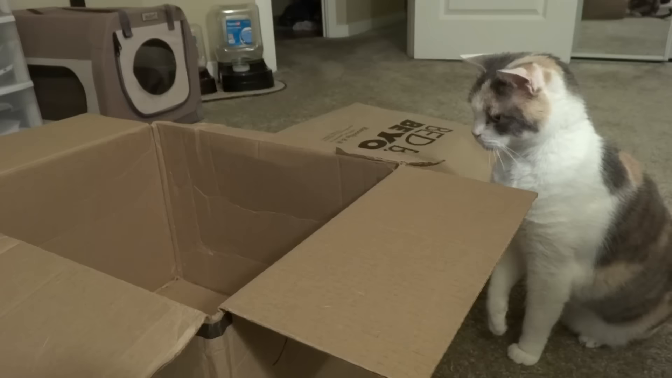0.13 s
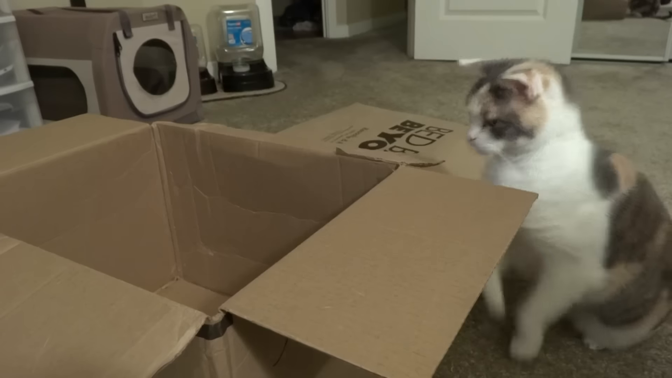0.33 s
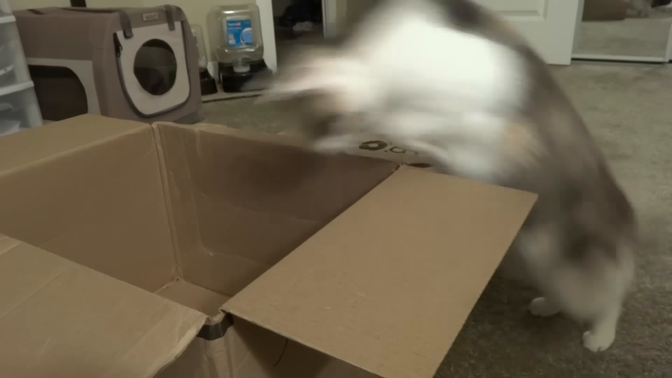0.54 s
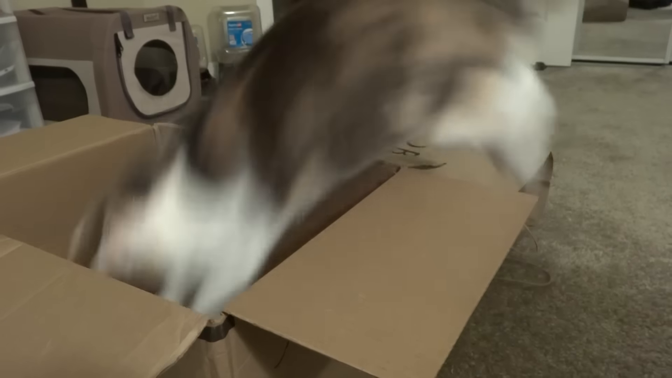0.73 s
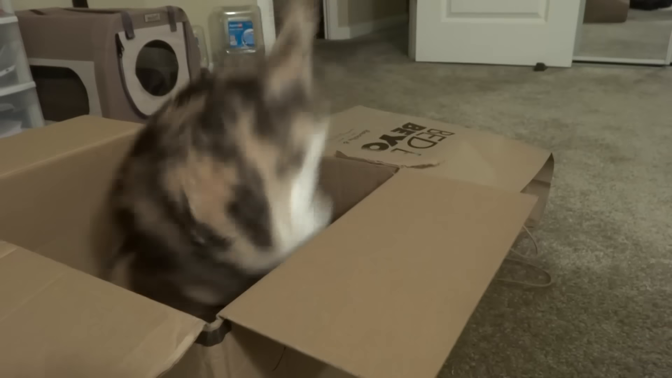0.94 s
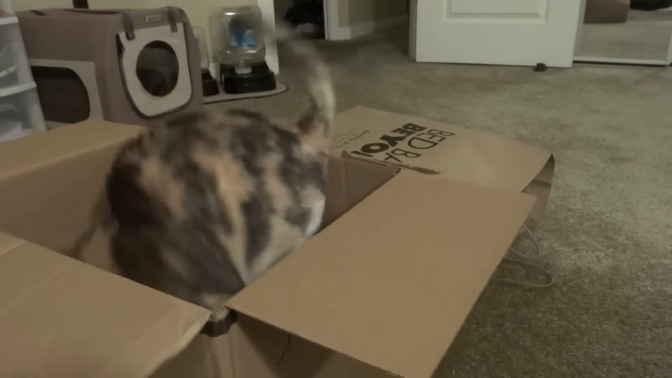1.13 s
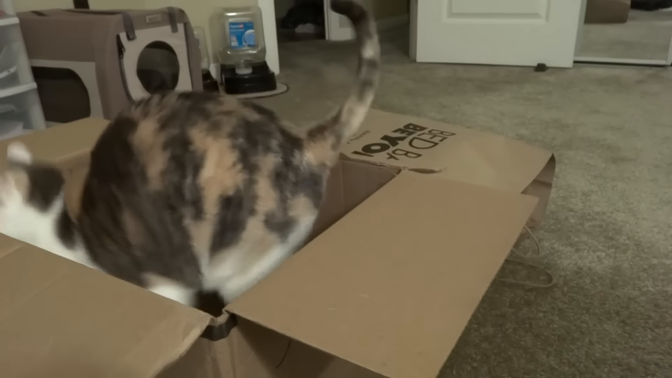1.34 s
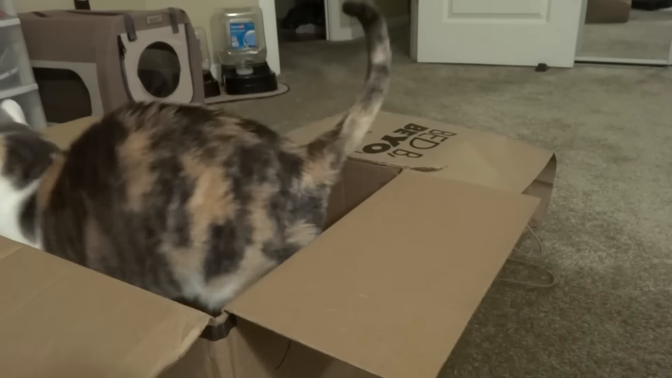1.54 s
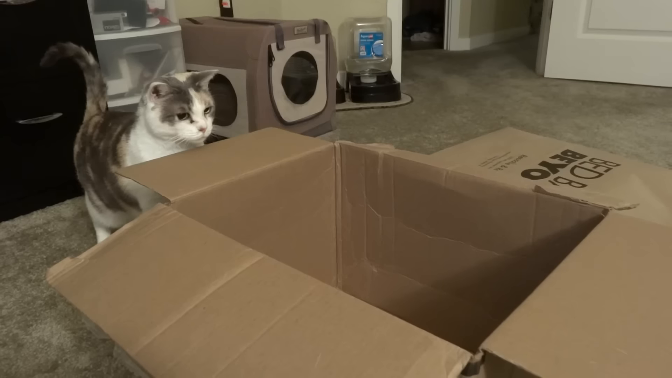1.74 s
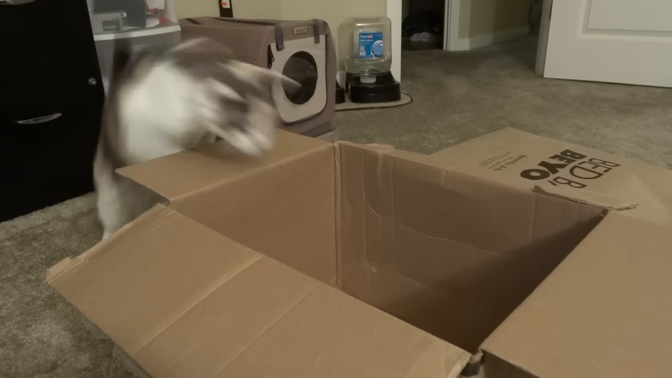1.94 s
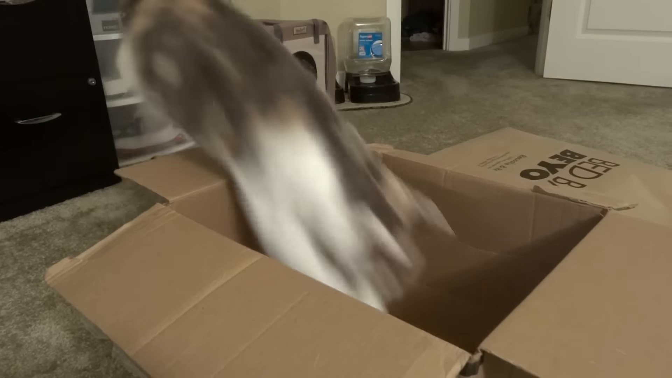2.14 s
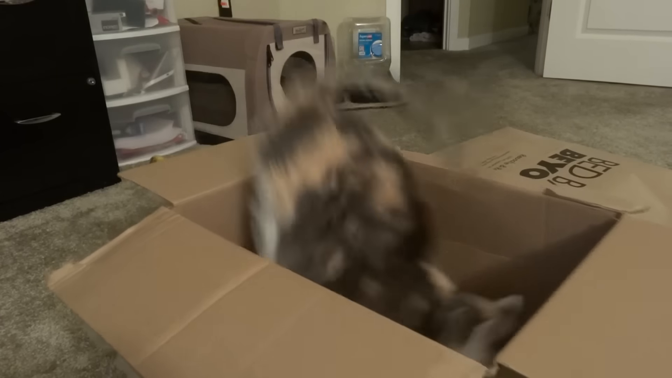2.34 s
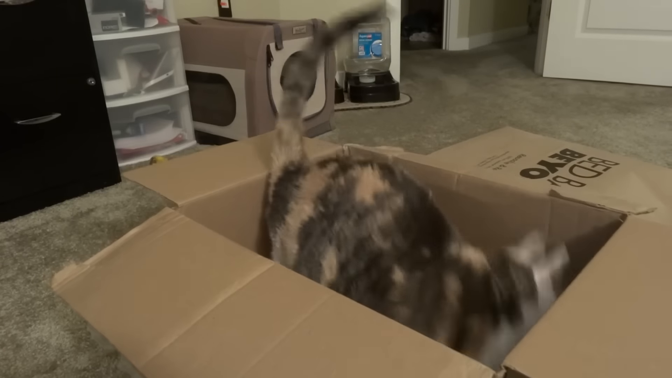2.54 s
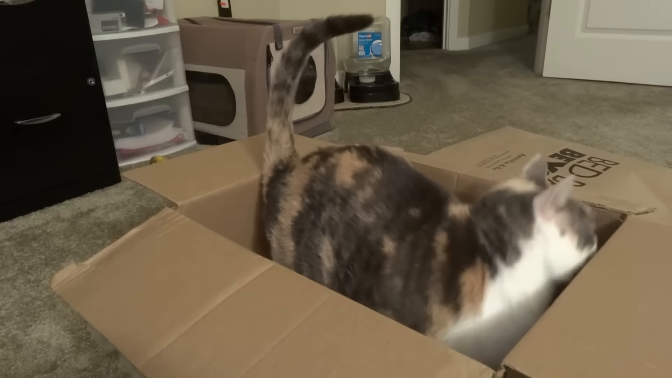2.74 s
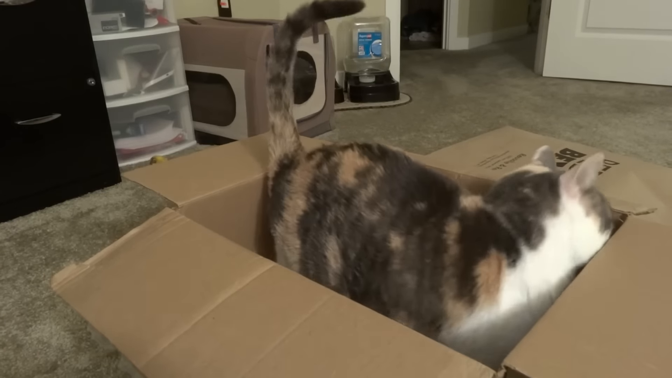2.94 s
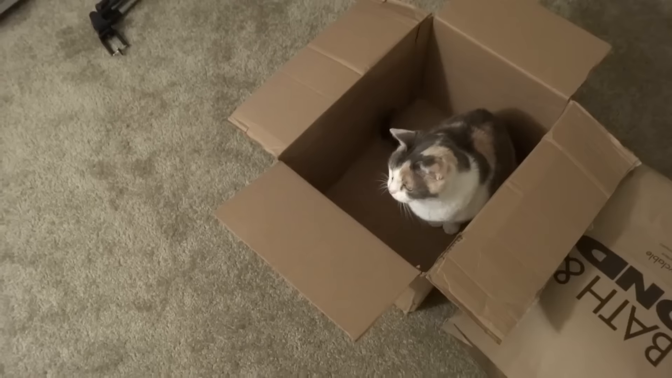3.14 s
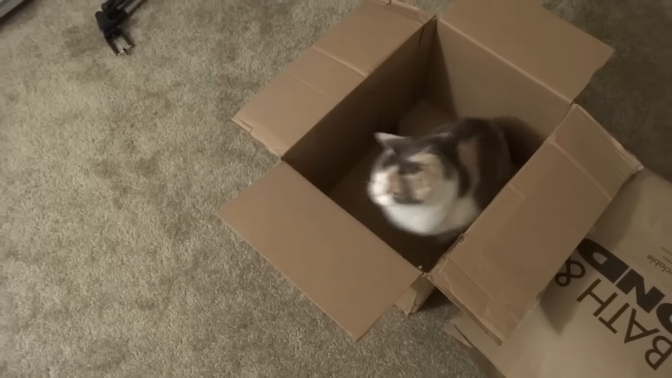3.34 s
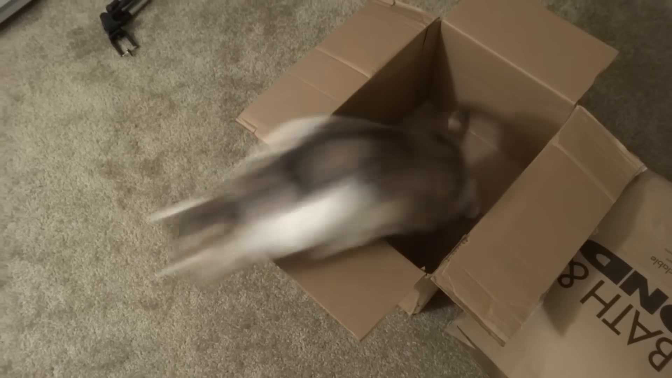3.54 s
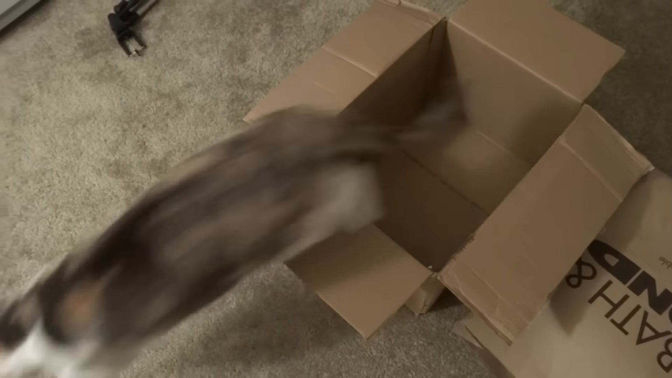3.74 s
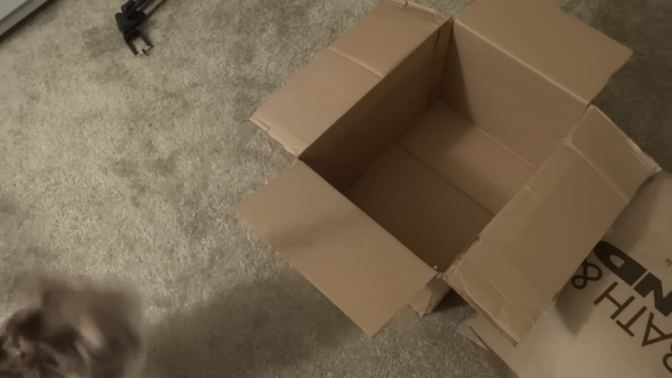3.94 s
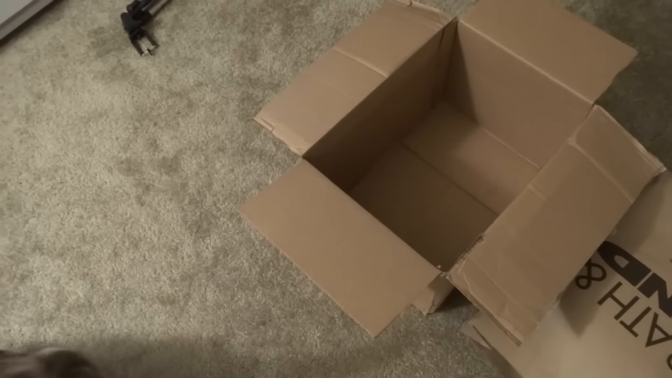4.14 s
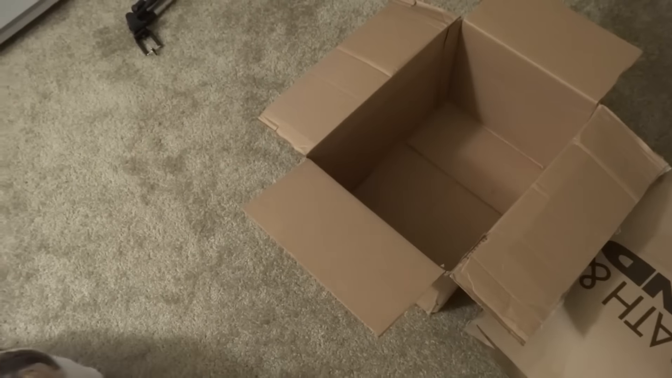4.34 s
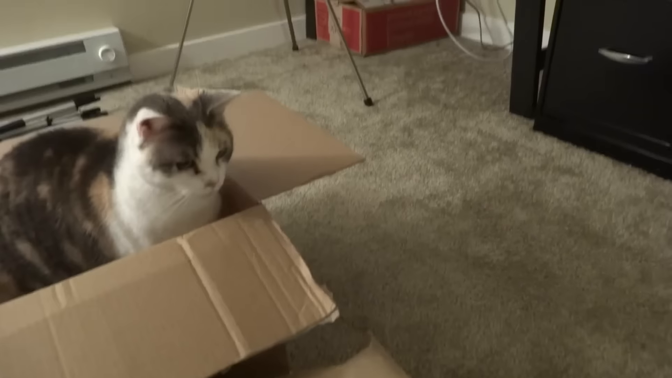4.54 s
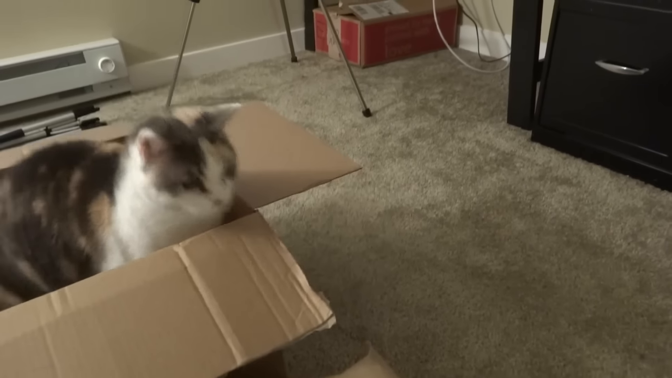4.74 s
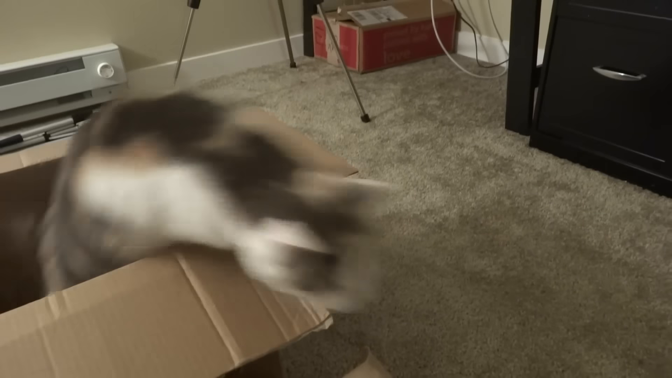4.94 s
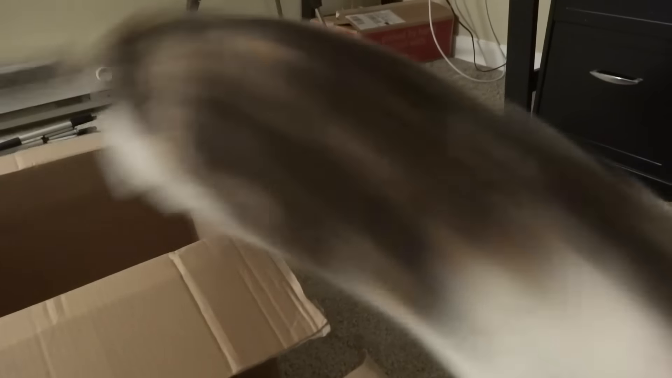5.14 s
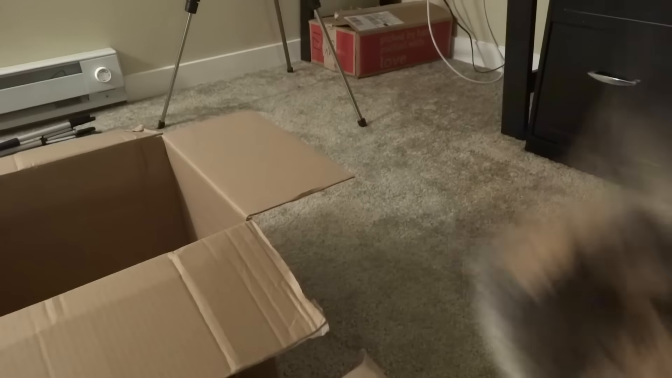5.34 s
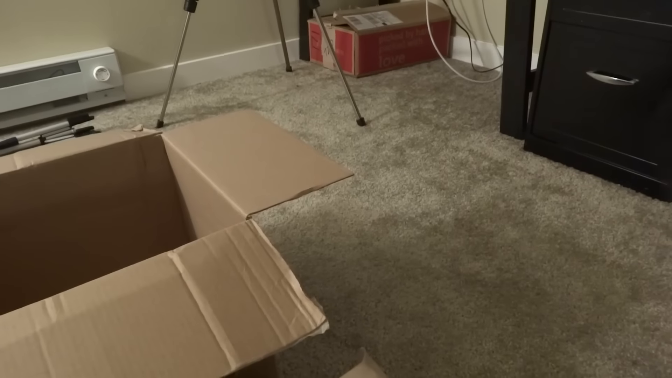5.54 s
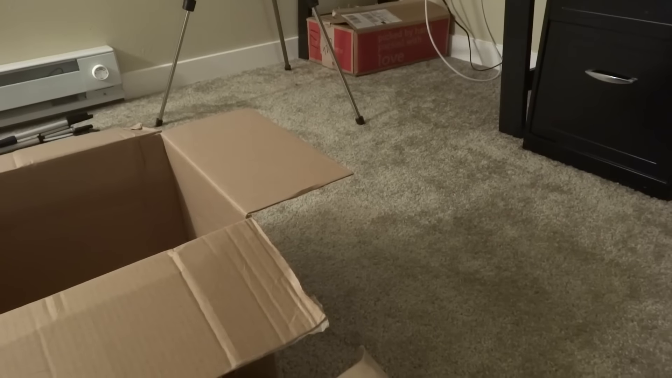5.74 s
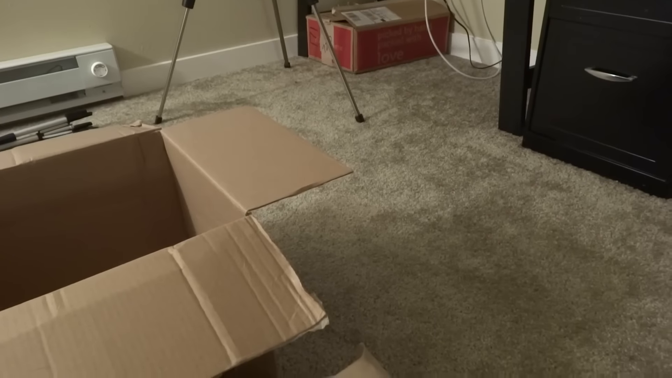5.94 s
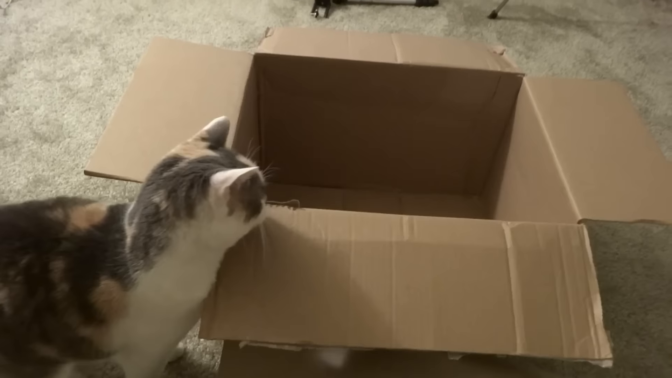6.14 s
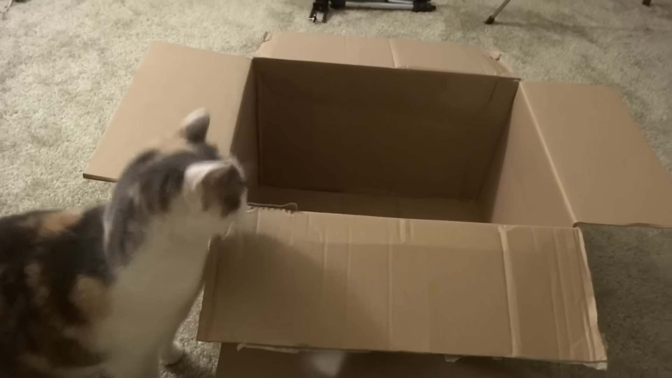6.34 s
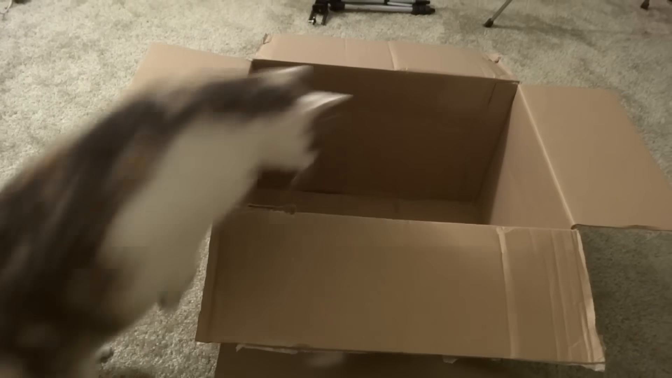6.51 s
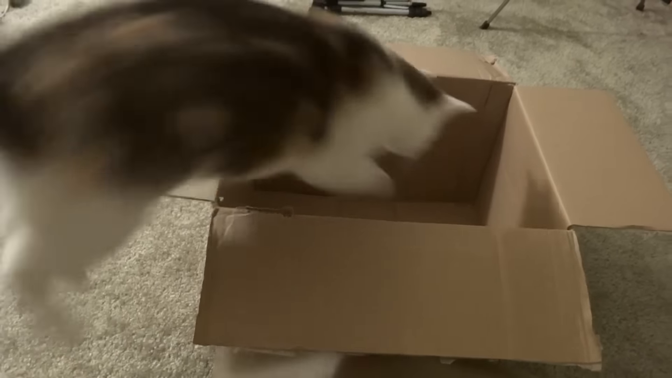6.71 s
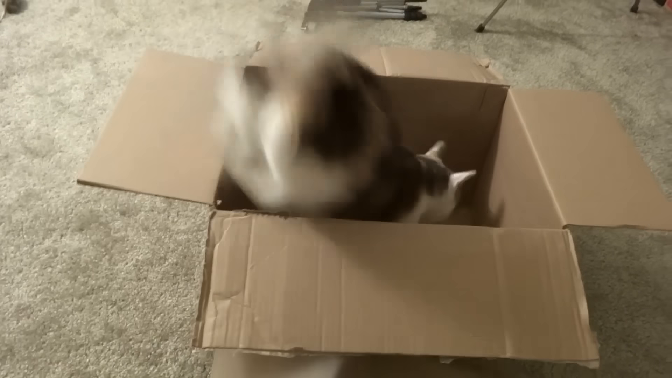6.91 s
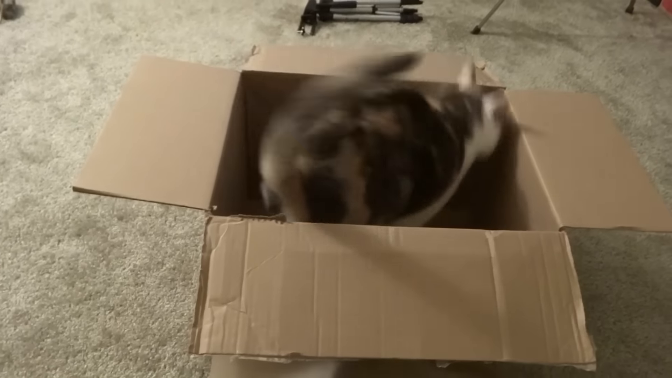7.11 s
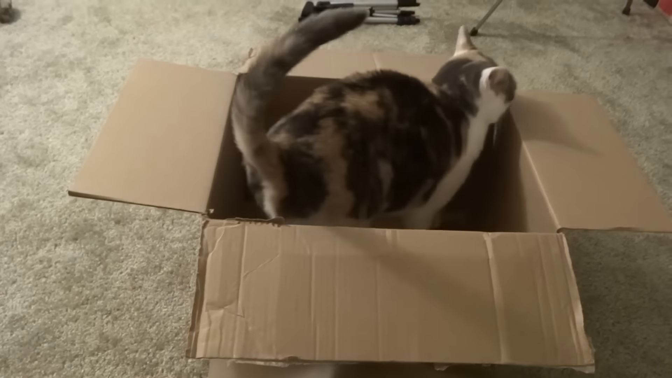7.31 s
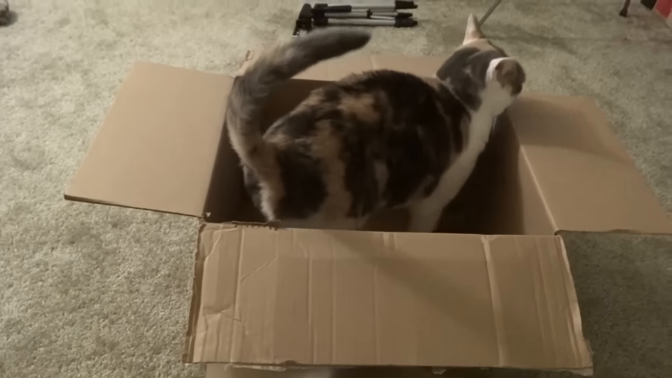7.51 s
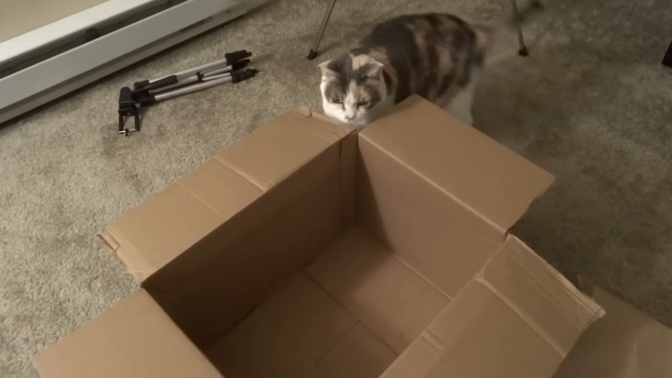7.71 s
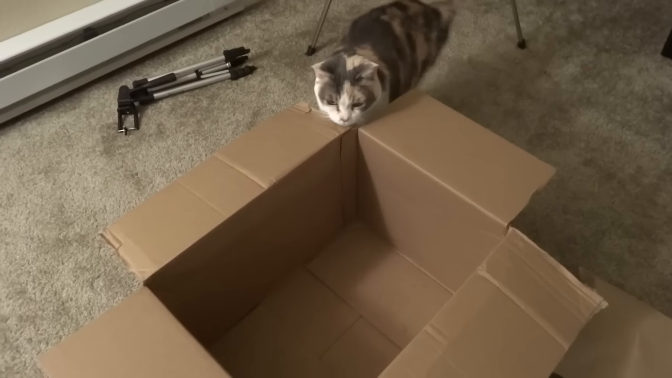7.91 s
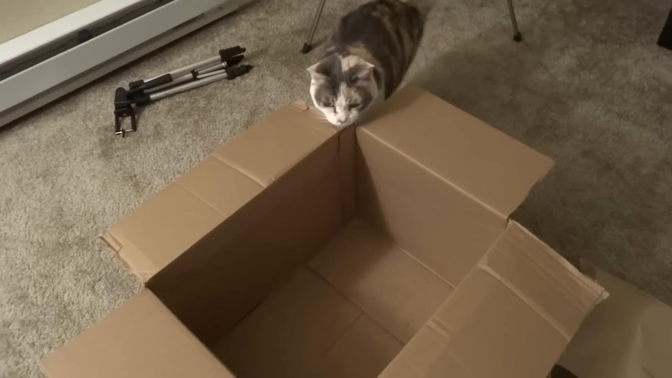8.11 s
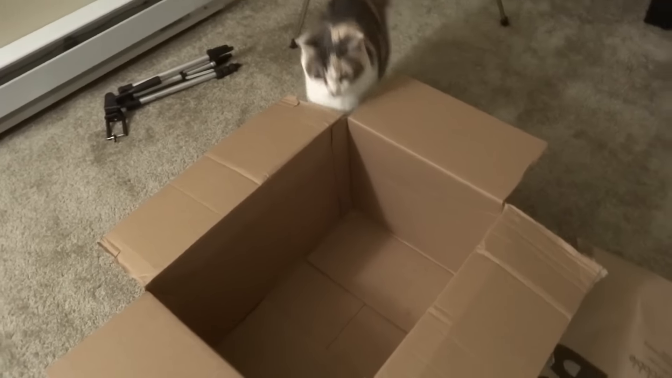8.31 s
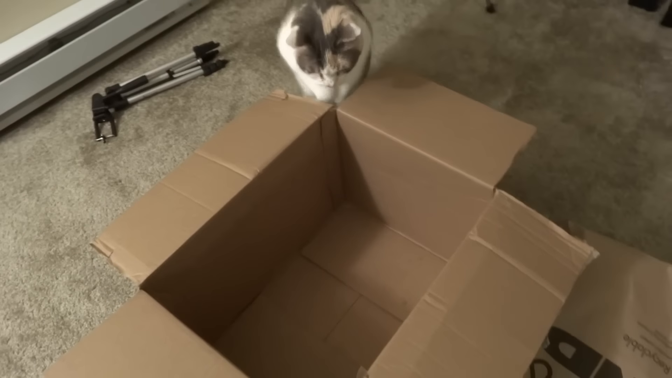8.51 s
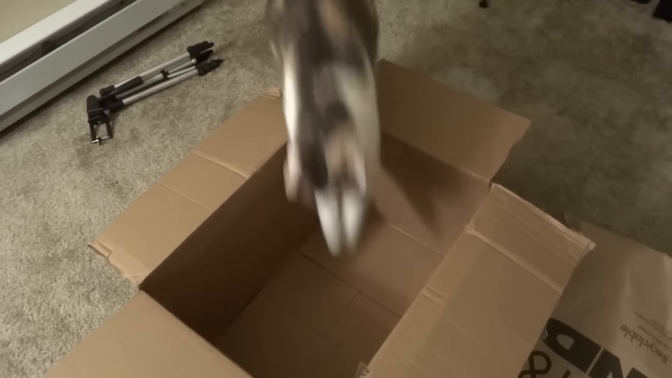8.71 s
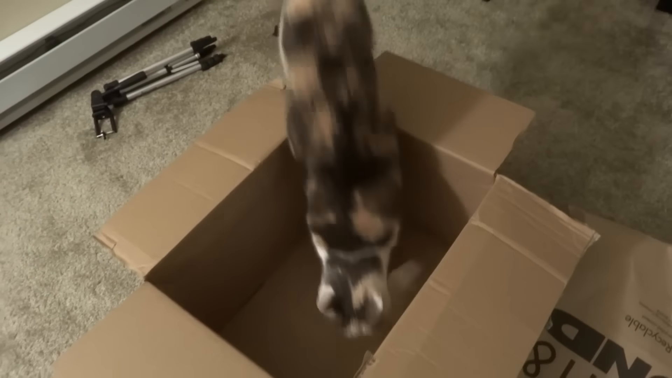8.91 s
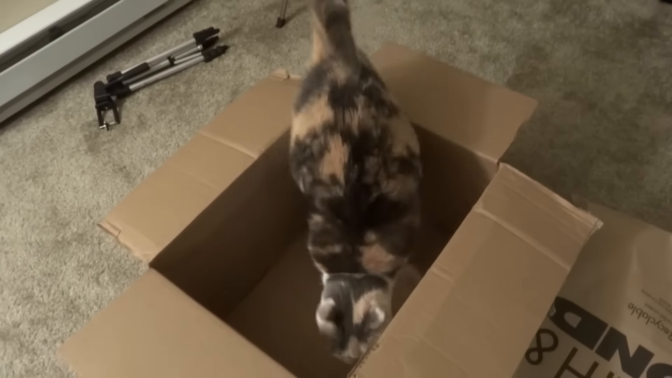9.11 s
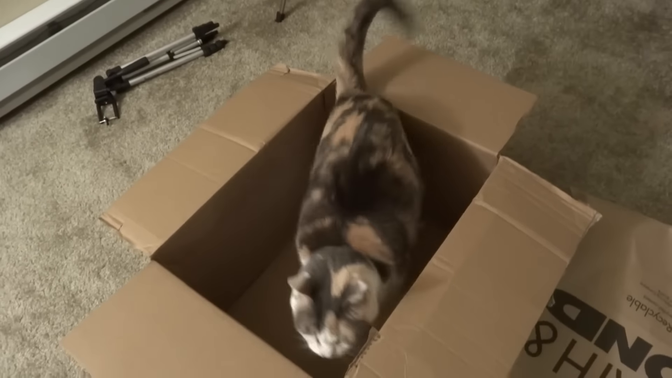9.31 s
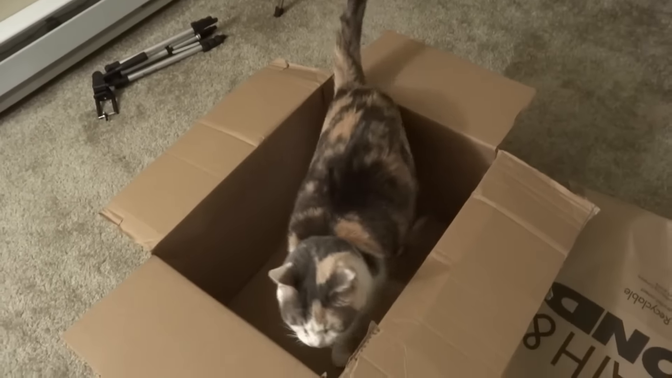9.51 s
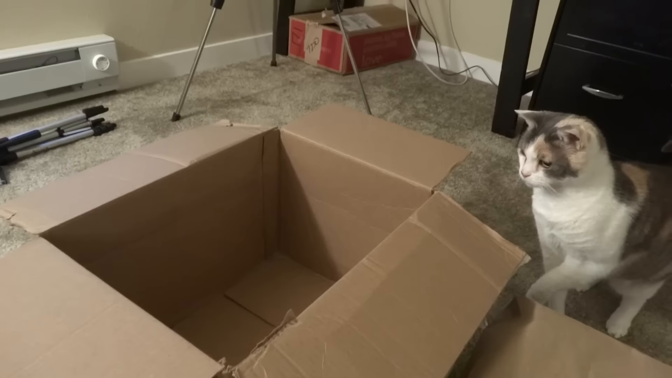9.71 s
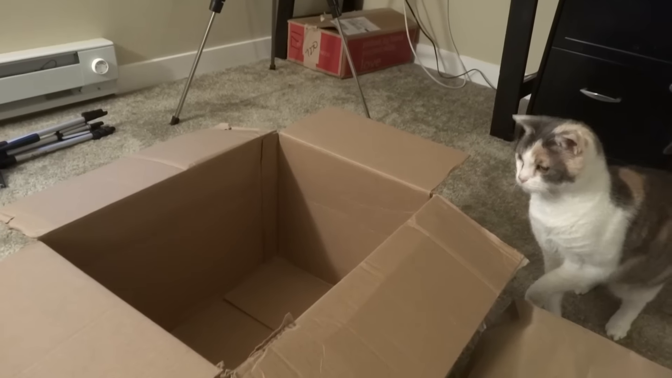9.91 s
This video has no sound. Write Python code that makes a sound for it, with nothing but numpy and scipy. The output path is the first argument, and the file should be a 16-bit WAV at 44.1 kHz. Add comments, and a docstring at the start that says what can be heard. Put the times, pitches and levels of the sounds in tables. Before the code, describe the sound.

A cat leaps repeatedly in and out of a cardboard box on carpet, with hollow thumps, scrapes and one tiny trill over shifting room hum.

```python
"""Hum, rumble and hiss last throughout, changing with most standpoints; a thin whine comes and goes in
steps of its own. A cat jumps in and out of a cardboard box on a carpet: from 0.6 s slaps, scraping and the
dying rustle after slaps drive the board's resonances with random clicks; from 0.9 s paws thump the box modes
and the floor. From 3.9 s a loose flap rings in damped sines; at 8 s a noise burst snaps close by; at 8.5 s
the cat trills in fluttering harmonics. All but background and snap excite a room tail of decaying noise."""
import sys
import numpy as np
from scipy import signal
from scipy.fft import rfft, irfft
from scipy.io import wavfile

SR = 44100
rng = np.random.default_rng(int(sys.argv[2]) if len(sys.argv) > 2 else 0)


def dump(signal):
    """Clip the signal to [-1, 1] and save it as 16-bit WAV at the path in sys.argv[1]."""
    limited = np.clip(np.atleast_2d(signal).T, -1, 1)
    pcm = np.round(limited * 32767).astype(np.int16)
    wavfile.write(sys.argv[1], SR, pcm)


N = 439236
TIME = np.arange(N) / SR

# standpoints, each starting abruptly: start t/s, low hum level/dB, upper hum level/dB,
# rumble level/dB, hiss level/dB
STANDPOINTS = [(0, -77, -62, -54, -56.5), (.15, -53.5, -80, -53.5, -56.5), (1.654, -51, -65.5, -53, -57.5),
               (3.17, -58, -66.5, -49.5, -56.5), (4.42, -53, -73, -53.5, -56.5),
               (6.15, -57, -66, -53, -56.5), (7.661, -79, -48, -50, -54.5), (9.661, -72, -69.5, -57, -57)]
# slaps and ticks on the board: t/s, rattle drive level/dB, favoured f/Hz, treble drive level/dB,
# knock drive level/dB
SLAPS = [(0.567, -45, 1100, -48, -48), (0.682, -63, 3950, -35.5, -54), (0.854, -16, 1560, -27, -18),
         (1.09, -48, 900, -33, -40), (1.111, -39, 524, -34, -9), (1.409, -32, 1080, -51, -34),
         (1.45, -27, 600, -40, -29), (1.583, -21.5, 1750, -30, -28), (2.281, -27, 770, -26, -15),
         (2.344, -39, 980, -25, -37), (2.409, -10, 5040, -12, -7.5), (2.426, -30, 770, -12, -17.5),
         (2.455, -26, 1580, -21, -27), (2.733, -34, 1300, -60, -33), (3.203, -63, 557, -59, -47),
         (3.386, -35, 1520, -54, -38.5), (3.582, -55, 2500, -39, -50), (3.653, -22, 2020, -34, -24.5),
         (3.661, -41, 1080, -27, -28), (3.893, -32, 900, -32, -17.5), (4.09, -41, 564, -54, -37),
         (5.094, -24, 1970, -28, -19.5), (5.532, -27, 494, -49, -22), (5.776, -48, 1450, -40, -47),
         (6.88, -7, 750, -23.5, -17.5), (7.109, -39, 560, -32, -27), (7.207, -55, 2630, -45, -30.5),
         (7.366, -27, 850, -38, -26), (7.504, -37, 890, -54, -45), (8.911, -9, 830, -34, -18.5),
         (8.983, -41, 483, -26, -29), (8.994, -28, 1730, -30, -24), (9.298, -35, 560, -50, -35),
         (9.318, -46, 660, -40, -37), (9.383, -35, 2280, -42, -33), (9.578, -24, 890, -37, -29.5)]
# resonances of the board under a sharp contact: f/Hz, width/Hz, level/dB
BOARD = [(454, 246, 0.5), (609, 109, 1), (754, 96, 1.5), (880, 176, 1), (1038, 170, 2), (1346, 240, 3.5),
         (1610, 270, 3), (1905, 168, 2), (2180, 450, 3), (2755, 466, 5), (3260, 1150, 2.5), (3846, 270, -4),
         (4680, 620, -10.5)]
BOARD_HZ = np.array(BOARD)[:, 0]


def amp(db):
    """Decibel law: the amplitude gain of a level in dB."""
    return 10 ** (np.asarray(db) / 20)


def rms_one(x):
    """Power normalization: x scaled to rms 1."""
    return x / np.sqrt(np.mean(x ** 2) + 1e-20)


def at_hz(points, hz):
    """Spectral interpolation: a table read on a logarithmic frequency axis."""
    table = np.array(points)
    return np.interp(np.log(hz + 1), np.log(table[:, 0]), table[:, 1])


def coloured(x, points):
    """Spectral shaping: x weighted by a spectrum table, silent outside it."""
    hz = np.fft.rfftfreq(N, 1 / SR)
    inside = (hz > points[0][0]) & (hz < points[-1][0])
    return irfft(rfft(x) * amp(at_hz(points, hz)) * inside, N)


def bandpassed(x, order, low_hz, high_hz):
    """Band limitation: a Butterworth filter passes the range between two edges."""
    return signal.sosfilt(signal.butter(order, [low_hz, high_hz], "band", fs=SR, output="sos"), x)


def drift(rate):
    """Slow random modulation: straight lines join `rate` normal values per second, spread about 1."""
    knots = rng.standard_normal(int(N / SR * 200))
    return np.interp(TIME * rate, np.arange(len(knots)), knots) * np.sqrt(1.5)


def held(rows):
    """Stepwise control: each row's levels, as gains, last until the next row starts."""
    s, *levels = np.transpose(rows)
    return amp(levels)[:, np.searchsorted(s, TIME, "right") - 1]


def ring(x, hz, t60):
    """Damped oscillation: a unit click sets a sine of initial height 1 ringing."""
    r, w = amp(-60 / (t60 * SR)), 2 * np.pi * hz / SR
    return signal.lfilter([0, np.sin(w)], [1, -2 * r * np.cos(w), r * r], x + 1e-18)


def resonance(x, hz, width):
    """Driven resonance: a two-pole band-pass with gain 1 at its peak."""
    r = np.exp(-np.pi * width / SR)
    poles = [1, -2 * r * np.cos(2 * np.pi * hz / SR), r * r]
    return signal.lfilter([(1 - r * r) / 2, 0, (r * r - 1) / 2], poles, x + 1e-18)


def favour_db(hz, favoured_hz, per_octave_db):
    """Modal excitation: the spot that is hit favours resonances near one pitch."""
    return -per_octave_db * np.log2(np.asarray(hz) / favoured_hz) ** 2


def background():
    """Stationary sources: wavering sines for hum and whine, filtered noise for rumble and hiss."""
    # a thin whine that comes and goes in steps of its own: start t/s, level/dB
    whine_steps = [(0, -78), (3.17, -99), (6.15, -80), (7.661, -71), (8.75, -85), (9.662, -69)]
    # noise spectra, each later scaled to its own level: f/Hz, relative density level/dB per Hz
    rumble_spectrum = [(13, -50.5), (22, -6.5), (64, -10.5), (91, -4.5), (123, -4), (147, -7.5), (217, -8),
                       (236, -8.5), (404, -18), (700, -31), (910, -64), (1540, -120)]
    hiss_spectrum = [(290, -15.5), (500, 0.5), (678, 0), (855, 0), (1140, 0.5), (1670, -2), (2650, -8.5),
                     (3250, -9.5), (9630, -12), (11800, -11.5), (16000, -13)]
    # stereo width of the noise: f/Hz, side against mid level/dB
    noise_width = [(60, -14), (150, -12), (380, -2), (950, 0), (2380, -2), (5980, -6), (15000, -16)]
    low_hum_hz, upper_hum_hz, whine_hz = 118.4, 242.2, 11999
    rumble_sway_db, hiss_sway_db = 1.2, .3

    low, upper, rumble, hiss = held(STANDPOINTS)
    whine = held(whine_steps)[0]
    out = 0
    for gain, hz in [(low, low_hum_hz), (upper, upper_hum_hz), (whine, whine_hz)]:
        wavering_gain = gain * amp(0.5 * drift(6.6))
        phase = 2 * np.pi * hz * TIME + 0.088 * drift(10)
        out = out + wavering_gain * np.sqrt(2) * np.sin(phase)

    full_width = [(10, -22.0)] + noise_width + [(20000, -22)]
    rumble = rumble * amp(rumble_sway_db * drift(4.3))
    hiss = hiss * amp(hiss_sway_db * drift(4.3))
    for gain, spectrum in [(rumble, rumble_spectrum), (hiss, hiss_spectrum)]:
        mid, side = rng.standard_normal((2, N))
        mid = coloured(mid, spectrum)
        side = coloured(coloured(side, spectrum), full_width)
        out = out + gain * (mid + side * [[1], [-1]]) / np.std(mid)
    return out


def contact_envelopes():
    """Power addition: slaps, scraping and dying rustle together drive the resonances and the treble."""
    # scraping of board and the dying rustle after slaps: peak t/s, swell/s, fade/dB per s,
    # hollow drive level/dB, papery drive level/dB, treble drive level/dB
    scrapes_and_tails = [(0.686, 0.03, 122, -59, -64, -44), (0.854, 0.0032, 155, -19, -22.5, -26),
                         (1.113, 0.035, 283, -22, -32, -26), (1.18, 0.15, 72, -47, -42.5, -38.5),
                         (1.412, 0.022, 143, -33, -37.5, -46), (1.47, 0.043, 220, -36, -54, -45.5),
                         (1.582, 0.0018, 175, -31, -32, -42), (1.982, 0.22, 130, -68, -61, -54),
                         (2.281, 0.00082, 180, -18, -20, -24), (2.376, 0.11, 200, -44, -36, -25),
                         (2.425, 0.087, 242, -18, -21, -17.5), (2.453, 0.025, 230, -21.5, -25.5, -21),
                         (2.733, 0.0026, 170, -44, -41.5, -59), (3.202, 0.035, 68, -59, -48, -53),
                         (3.418, 0.16, 73, -46.5, -48.5, -42.5), (3.637, 0.046, 150, -37.5, -45, -34.5),
                         (3.655, 0.0056, 183, -35, -26.5, -36), (3.73, 0.086, 194, -52, -61, -36),
                         (3.904, 0.018, 337, -20.5, -33, -28), (3.997, 0.079, 300, -35.5, -51, -45.5),
                         (4.123, 0.43, 125, -43.5, -52.5, -53), (4.79, 0.065, 60, -48.5, -58, -54),
                         (4.88, 0.046, 70, -49, -58, -57), (5.049, 0.074, 119, -31, -35.5, -28.5),
                         (5.078, 0.057, 203, -32, -47, -35), (5.104, 0.032, 258, -25.5, -21, -35),
                         (5.336, 0.027, 161, -45.5, -49.5, -52), (5.536, 0.051, 185, -36, -41.5, -41),
                         (5.786, 0.48, 83, -59, -56, -46.5), (6.52, 0.049, 300, -68, -71, -50),
                         (6.658, 0.16, 168, -50, -46.5, -47), (6.884, 0.0024, 194, -16.5, -22, -26),
                         (7.118, 0.037, 240, -27, -38.5, -35), (7.21, 0.036, 250, -39.5, -40, -42),
                         (7.376, 0.017, 277, -29, -37.5, -36), (7.536, 0.45, 170, -49, -53.5, -59),
                         (8.746, 0.076, 100, -49.5, -73, -58), (8.913, 0.0022, 164, -19, -26, -31.5),
                         (8.984, 0.0088, 220, -37, -32, -36.5), (9.122, .1, 56, -47, -57, -65),
                         (9.31, 0.027, 160, -43.5, -46.5, -43), (9.383, 0.018, 125, -43, -44, -52),
                         (9.578, 0.0048, 164, -32.5, -33.5, -48)]
    # centres of the hollow and the papery part: f/Hz
    part_hz = [785, 2560]
    slap_t60_s, longest_fade_s = 0.025, .5   # the latter counts from the peak
    swell_db = 25   # each scrape or rustle enters this far below its peak

    body, treble = np.zeros((len(BOARD), N)), np.zeros(N)   # powers until the end
    after = TIME[:SR // 8]
    decay = amp(-60 * after / slap_t60_s) ** 2
    for s, rattle_db, hz, treble_db, _ in SLAPS:
        start = round(s * SR)
        span = slice(start, start + len(after))
        rattle = amp(rattle_db + favour_db(BOARD_HZ, hz, per_octave_db=4)) ** 2
        body[:, span] += np.outer(rattle, decay)
        treble[span] += amp(treble_db) ** 2 * decay

    octave_share = np.log(BOARD_HZ / part_hz[0]) / np.log(part_hz[1] / part_hz[0])
    papery = np.clip(octave_share, 0, 1)[:, None]   # 0 hollow, 1 papery
    changes = np.append(np.array(STANDPOINTS)[:, 0], N / SR)
    for s, swell, fade_db, hollow_db, papery_db, treble_db in scrapes_and_tails:
        end = min(s + longest_fade_s, changes[changes > s][0])   # a change of standpoint ends it
        span = slice(round((s - swell) * SR), round(end * SR))
        since = TIME[span] - s
        power = amp(np.where(since < 0, swell_db * since / swell, -fade_db * since)) ** 2
        body[:, span] += amp((1 - papery) * hollow_db + papery * papery_db) ** 2 * power
        treble[span] += amp(treble_db) ** 2 * power
    return np.sqrt(body), np.sqrt(treble)


def grains(per_s, spread_db):
    """Poisson-like impulses: random clicks of uneven size and either sign."""
    sizes = amp(spread_db * np.minimum(rng.exponential(1, N), 5)) * rng.choice([-1, 1], N)
    return sizes * (rng.random(N) < per_s / SR)


def board(drive):
    """Modal superposition: parallel board resonances, signs alternating, each with its own drive."""
    out = 0
    for k, (hz, width, level_db) in enumerate(BOARD):
        passed_share = np.pi / 2 * width / (SR / 2)   # of the power of white noise
        out = out + (-1) ** k * amp(level_db) * resonance(drive[k], hz, width) / np.sqrt(passed_share)
    return out / np.sqrt(len(BOARD) / 2)


def cardboard():
    """Granular excitation: clumped clicks drive waxing and waning resonances; finer ones rustle."""
    # bright rustle, before scaling to rms 1: f/Hz, relative density level/dB per Hz
    rustle_spectrum = [(2060, -23), (3500, -6.5), (4210, -5), (4570, -7), (5670, -7.5), (6740, -5.5),
                       (10300, -4.5), (14600, -10), (16000, 13)]
    patch_db = 1.8   # spread of the waxing and waning

    body, treble = contact_envelopes()
    clicks = rms_one(grains(per_s=5000, spread_db=3.0) * amp(1.0 * drift(90)))
    fine = rms_one(grains(per_s=9000, spread_db=1.5) * amp(0.38 * drift(120)))
    patches = amp([patch_db * drift(35) for _ in BOARD])
    rustle = rms_one(coloured(fine + 0.21 * clicks, rustle_spectrum))
    return board(clicks * body * patches) + treble * rustle


def knocks():
    """Impulse response: one click per hard contact sets resonances near its pitch ringing freely."""
    clicks = np.zeros((len(BOARD), N))
    for s, _, hz, _, knock_db in SLAPS:
        clicks[:, round(s * SR)] += amp(knock_db + favour_db(BOARD_HZ, hz, per_octave_db=19))
    out = 0
    for k, (hz, width, _) in enumerate(BOARD):
        t60 = 2.15 * np.log(1000) / (np.pi * width)   # longer than the width alone implies
        out = out + (-1) ** k * ring(clicks[k], hz, t60)
    return out


def snaps():
    """Broadband impulse: each hard contact starts with a bare click, band-limited to the highs."""
    clicks = np.zeros(N)
    for s, _, _, treble_db, _ in SLAPS:
        clicks[round(s * SR)] = amp(treble_db + 19)   # dB over the treble drive, before the filter
    return bandpassed(clicks + 1e-18, 1, 3000, 11000)


def thumps():
    """Modal excitation: soft paws push every box mode with its own strength, and thud on the floor."""
    # padded landings: t/s, push level/dB before the modes, favoured f/Hz, floor push level/dB
    landings = [(0.859, -14.5, 219, -17.5), (0.884, -14.5, 230, -20.5), (0.919, -16, 161, -37),
                (1.085, -3.5, 190, -18.5), (1.109, -7, 220, -38), (1.141, -19, 154, -20.5),
                (1.445, -20.5, 199, -36), (1.478, -30, 344, -42), (1.585, -31, 233, -44),
                (2.281, -7.5, 162, -23), (2.294, -4.5, 256, -35), (2.31, -11, 166, -34),
                (2.333, -19, 346, -32), (2.369, -19, 238, -31), (2.409, -17.5, 356, -26),
                (2.455, -8, 240, -25), (2.508, -19, 250, -42), (2.878, -36.5, 206, -47),
                (3.4, -32, 110, -60), (3.64, -29, 224, -44), (3.96, -25.5, 253, -32),
                (3.998, -31, 247, -33), (4.094, -15, 146, -42), (4.12, -24, 178, -31),
                (4.139, -20.5, 128, -38), (4.164, -20, 122, -35), (4.198, -22.5, 125, -47),
                (4.246, -26.5, 136, -51), (4.859, -29.5, 114, -61), (5.009, -28, 315, -44),
                (5.033, -24.5, 334, -24.5), (5.064, -16.5, 124, -29), (5.097, -18.5, 152, -36),
                (5.151, -23.5, 185, -31), (5.331, -21, 176, -51), (5.366, -30, 175, -40),
                (5.497, -19, 128, -54), (5.525, -26, 334, -50), (5.579, -37, 116, -42),
                (6.876, -7.5, 294, -35), (6.909, -5, 191, -25), (6.949, -19, 236, -22),
                (7.111, -16.5, 256, -32), (7.13, -15.5, 126, -46), (7.158, -18.5, 243, -30),
                (8.917, -12, 238, -38), (8.945, -16, 224, -26.5), (9.296, -18.5, 235, -48),
                (9.328, -23, 242, -58.5), (9.379, -27, 189, -59)]
    # the box under a soft paw: f/Hz, level/dB, t60/s
    box_modes = [(125, -2.5, 0.064), (145.4, -10, 0.26), (176, -2.5, 0.063), (199.4, -2.5, 0.061),
                 (241.7, -1, 0.064), (297, -8.5, 0.17), (348, -3.5, 0.11), (438.3, -6.5, 0.22)]
    floor_hz, floor_t60_s = 57, .24

    thud, pushes = np.zeros(N), np.zeros((len(box_modes), N))
    chance = rng.normal(0, 1, (len(landings), len(box_modes)))
    signs = (-1.) ** np.arange(len(box_modes))
    mode_hz = np.array(box_modes)[:, 0]
    for (s, push_db, hz, thud_db), vary in zip(landings, chance):
        near_db = favour_db(mode_hz, hz, per_octave_db=22.0)
        pushes[:, round(s * SR)] += signs * amp(push_db + near_db + 2 * vary)
        thud[round(s * SR)] += amp(thud_db)
    box = sum(amp(level_db) * ring(push, hz, t60)
              for (hz, level_db, t60), push in zip(box_modes, pushes))
    padded = bandpassed(box, 2, 60, 700)   # soft pads, small panel
    # the carpet slows the thud
    cushioned = signal.sosfilt(signal.butter(2, 140, fs=SR, output="sos"), thud)
    return padded + ring(cushioned, floor_hz, floor_t60_s)


def flap():
    """Free vibration: a loose flap, kicked, slaps back, bounces and rings in its modes."""
    # kicks at take-off or landing and the bounces: t/s, level/dB before the modes
    flap_slaps = [(3.893, -12), (3.904, -34), (3.931, -17), (8.912, -21.5)]
    # modes of the flap: f/Hz, level/dB, t60/s
    flap_modes = [(165, -10, .15), (236, -5, .2), (253, 0, .22), (415, -15, .15), (533, -19, .15),
                  (800, -8, .13), (850, -9, .12), (904, -10, .19), (1104, -15, .15), (1600, -17, .08),
                  (1830, -14, .12), (2568, -18, .1)]
    clicks = np.zeros(N)
    for s, level_db in flap_slaps:
        clicks[round(s * SR)] = amp(level_db)
    return sum((-1) ** k * amp(level_db) * ring(clicks, hz, t60)
               for k, (hz, level_db, t60) in enumerate(flap_modes))


def near_tick():
    """Direct sound alone: a short bright noise burst, too close to the microphone to stir the room."""
    # the dry snap: t/s, initial level/dB before the filter, t60/s
    s, level_db, t60 = (7.967, -22.5, 0.014)
    envelope = amp(level_db - 60 * np.clip(TIME - s, 0, 1) / t60) * (TIME >= s)
    return bandpassed(envelope * rng.standard_normal(N), 1, 2500, 9000)


def trill():
    """Harmonic source: a closed-mouth call of unsteady pitch; overtones weaken faster than the level."""
    # course of the call: t/s, fundamental f/Hz before its wobble, level/dB before the flutter
    trill_course = [(8.525, 535, -48), (8.533, 524, -51), (8.599, 389.5, -45.5), (8.653, 354, -43.5),
                    (8.731, 368, -58), (8.741, 364, -59), (8.76, 375, -68)]
    harmonics_db, flutter_hz = [0, -15, -8], 27

    s, pitch, level_db = np.transpose(trill_course)
    level_db = np.interp(TIME, s, level_db, -200, -200)
    effort = amp(level_db - level_db.max())
    unsteady_hz = np.interp(TIME, s, pitch) * (1 + .035 * drift(70))
    phase = 2 * np.pi * np.cumsum(unsteady_hz) / SR
    tone = sum(amp(db) * effort ** k * np.sin((k + 1) * phase) for k, db in enumerate(harmonics_db))
    flutter = (1 + .35 * np.sin(2 * np.pi * flutter_hz * TIME)) * amp(2.5 * drift(40))
    return np.sqrt(2) * amp(level_db) * flutter * tone


def room(x):
    """Reverberation: octave bands of dying noise, most alike at both ears in the bass and top treble."""
    # decay: f/Hz, t60/s
    decay_times = [(60, 0.34), (250, 0.38), (1000, 0.33), (4000, 0.45), (12000, 0.067)]
    # tail against the direct sound: f/Hz, level/dB
    tail_levels = [(60, -18.5), (250, -3.5), (1000, -6.5), (4000, -9.5), (12000, -14)]
    # stereo width of the tail: f/Hz, side against mid level/dB
    tail_width = [(60, -39), (250, -9), (1000, -4.5), (4000, -6), (12000, -66)]

    t, edges = TIME[:SR // 2], 40 * 2. ** np.arange(10)
    tail = np.zeros((2, len(t)))
    for low, high in zip(edges, np.minimum(edges[1:], .45 * SR)):
        hz = np.sqrt(low * high)
        band = bandpassed(rng.standard_normal(tail.shape), 2, low, high)
        band *= amp(-60 * t / at_hz(decay_times, hz)) * np.clip(t / 0.00094, 0, 1)   # brief onset
        energy = np.sum(band ** 2, 1, keepdims=True)
        mid, side = band * np.sqrt((high - low) / (SR / 2) / energy)
        tail += amp(at_hz(tail_levels, hz)) * (mid + amp(at_hz(tail_width, hz)) * side * [[1], [-1]])
    # a change of standpoint ends the tail
    starts = [round(row[0] * SR) for row in STANDPOINTS[1:]]
    return np.hstack([signal.fftconvolve(part[None], tail, axes=1)[:, :len(part)]
                      for part in np.split(x, starts)])


def two_ports(x):
    """Interchannel phase: the left microphone port leads the right one, most in the middle range."""
    # lead of the left port: f/Hz, phase/rad
    left_lead = [(100, 0.14), (600, 0.56), (1030, 0.59), (1720, 0.5), (2760, 0.52), (3600, 0.41),
                 (16000, 0)]
    half = np.exp(.5j * at_hz(left_lead, np.fft.rfftfreq(N, 1 / SR)))
    return irfft(rfft(x) * [half, half.conj()], N)


def scene():
    """Superposition: cat and box close by in a carpeted room; lows lean left, the board leans right."""
    low = thumps() + trill()
    board_sound = cardboard() + knocks() + snaps() + flap()
    near = low * amp([[.35], [-.35]]) + board_sound * amp([[-.2], [.2]])
    return two_ports(near) + room(low + board_sound) + near_tick() + background()


def record(dry):
    """Band limitation and saturation: the deepest bass is lost, peaks are rounded, the top is cut."""
    thinned = signal.sosfilt(signal.butter(3, 38, "high", fs=SR, output="sos"), dry)
    rounded = 1.1 * np.tanh(thinned / 1.1)
    # 70 dB down from 15.9 kHz upwards
    return signal.sosfilt(signal.cheby2(14, 70, 15900, fs=SR, output="sos"), rounded)


dry = scene()
out = record(dry)
dump(out)
```